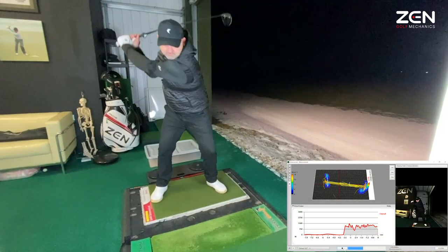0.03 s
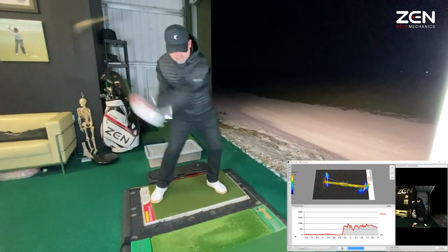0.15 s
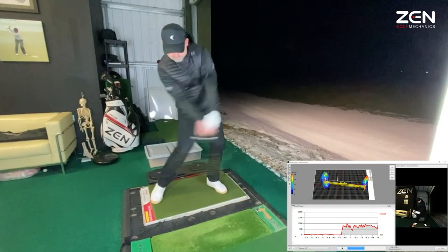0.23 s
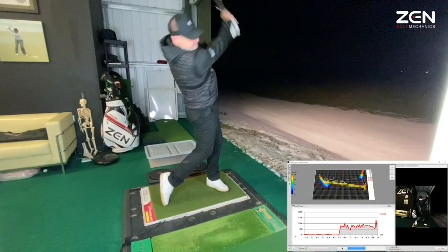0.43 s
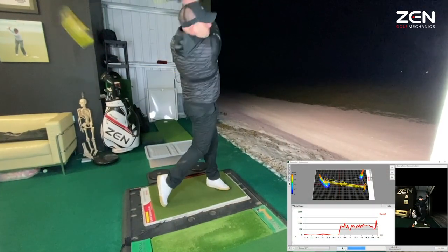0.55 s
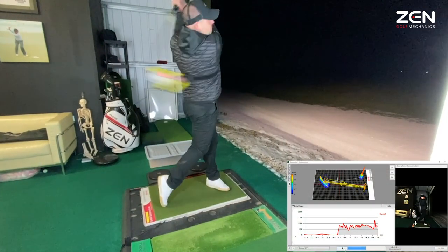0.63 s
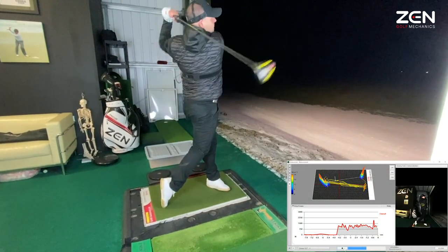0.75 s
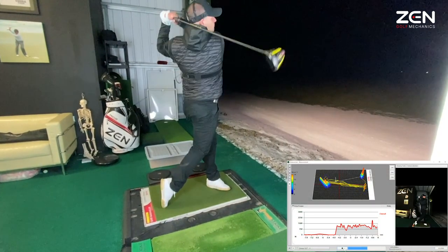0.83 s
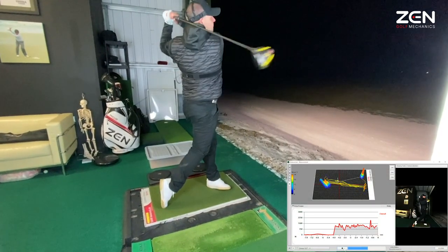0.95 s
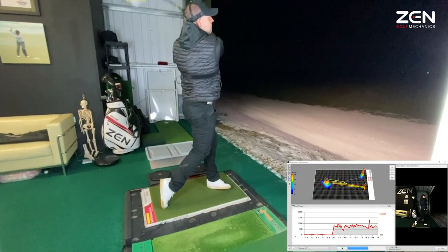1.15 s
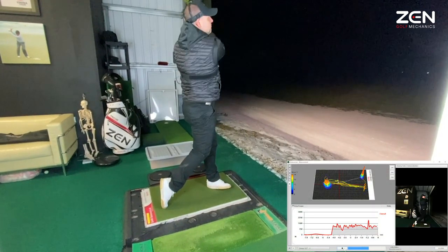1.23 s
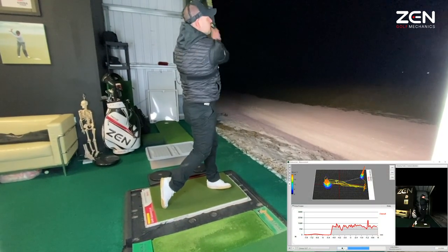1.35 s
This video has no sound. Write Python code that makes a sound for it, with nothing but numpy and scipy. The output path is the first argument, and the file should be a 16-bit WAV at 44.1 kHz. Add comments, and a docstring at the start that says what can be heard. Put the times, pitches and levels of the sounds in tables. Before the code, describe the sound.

Golf club hits ball: quick whoosh, sharp metallic crack, brief bright room ring, then faint clothing rustle

```python
"""Golf drive in an indoor practice bay

A driver is swung and hits a ball: noise bursts with duller echoes make the crack, sine modes the hollow head's ring.
Noise bands dying at their own rates make the hard-walled bay, and a slower burst the ball thudding into the screen.
Level-drawn noise is the air round club and sleeves, then jacket and shoes; low sines are the feet.
A faint room hiss lies underneath; the highest peaks overload and the top is cut."""
import sys
import numpy as np
from scipy import signal
from scipy.fft import rfft, irfft
from scipy.io import wavfile
from scipy.ndimage import uniform_filter1d

SR = 44100
rng = np.random.default_rng(int(sys.argv[2]) if len(sys.argv) > 2 else 0)


def to_wav(sig):
    """Store sig (one row per channel, or 1-D mono) as 16-bit WAV at the path in sys.argv[1].

    Samples outside -1..1 are clipped; the rate is SR.
    """
    pcm = np.clip(np.atleast_2d(sig), -1, 1) * 32767
    pcm = np.round(pcm).astype(np.int16)
    wavfile.write(sys.argv[1], SR, pcm.T)  # frames by channels


N = 61739
T = np.arange(N) / SR
HIT_S = .2385

# Spectrum levels are relative: noise() brings each colour to unit power.


def from_db(db):
    """Decibels to gain."""
    return 10 ** (np.asarray(db) / 20)


def rms_one(x):
    """Scale to unit power."""
    return x / np.sqrt(np.mean(x ** 2) + 1e-20)


def at_hz(points, hz, axis=1):
    """Read a table column on a log-frequency axis."""
    p = np.array(points)
    return np.interp(np.log(hz + 1), np.log(p[:, 0]), p[:, axis])


def level(curve):
    """Gain over time, drawn in straight dB lines between points."""
    return from_db(np.interp(T, *np.transpose(curve)))


def noise(spectrum):
    """White noise coloured by a spectrum table, at unit power."""
    hz = np.fft.rfftfreq(N, 1 / SR)
    coloured = rfft(rng.standard_normal(N)) * from_db(at_hz(spectrum, hz))
    return rms_one(irfft(coloured, N))


def lowpass(x, hz):
    """Gentle second-order treble cut."""
    return signal.sosfilt(signal.butter(2, hz, fs=SR, output="sos"), x)


def decay(start_s, t60_s, build_s=0.00038):
    """Quick rise, then exponential fall of 60 dB per t60; silent before the start."""
    age = np.maximum(T - start_s, 0)
    return (1 - np.exp(-age / build_s)) * from_db(-60 * age / t60_s)


def tick(start_s, level_db, centre_hz, t60_s, q=2.3):
    """A short noise burst through one broad resonance, its top softened."""
    resonance = signal.iirpeak(centre_hz, q, fs=SR)
    burst = signal.lfilter(*resonance, rng.standard_normal(N))
    burst = rms_one(lowpass(burst, centre_hz * 0.86))
    return from_db(level_db) * burst * decay(start_s, t60_s)


# colour of the crack: pitch_hz, level_db
CRACK_COLOUR = [(40,-55.5),(150,-36),(600,-27.5),(1300,-9),(2100,-12),(2900,0),(4000,-2.5),(5200,-4.5),(7500,-5),(9500,-15),(15500,-30)]
# the crack and its early echoes: delay_s after the hit, level_db relative to CRACK_DB, top_edge_hz
CRACK_ARRIVALS = [(0.0,0,12000),(.0065,-3,10000),(.0215,.5,6000),(.025,0,9000),(.0325,2,3800),(.0448,0,5200),(.058,-7,6000)]
CRACK_DB, CRACK_BUILD_S, CRACK_T60_S = -6, .0012, .028
# a hard snap just after the first contact
SNAP_S, SNAP_DB, SNAP_HZ, SNAP_T60_S = .2497, 2, 7400, .007


def crack():
    """The face meets the ball; nearby surfaces return copies with the treble trimmed."""
    out = 0
    for delay_s, level_db, top_edge_hz in CRACK_ARRIVALS:
        burst = noise(CRACK_COLOUR) * decay(HIT_S + delay_s, CRACK_T60_S, CRACK_BUILD_S)
        out = out + from_db(CRACK_DB + level_db) * lowpass(burst, top_edge_hz)
    return out + tick(SNAP_S, SNAP_DB, SNAP_HZ, SNAP_T60_S)


# ringing modes of the clubhead: pitch_hz, level_db relative to RING_DB, t60_s
RING_MODES = [(1357,-9,.12),(1461,-13,.3),(2788,-6,.27),(2899,1,.28),(2990,-2,.3),(3045,-4,.33),(3572,-6,.24),(3882,-4,.3),(4075,-3,.25),(4467,-6,.22),(4563,-4,.27),(5320,-4,.22),(6935,-7,.19),(7801,-7,.18)]
RING_DB, RING_BUILD_S = -20.5, .016


def head_ring():
    """Sine modes of the hollow head at random phases, swelling as the room fills."""
    out = 0
    for pitch_hz, level_db, t60_s in RING_MODES:
        mode = np.sin(2 * np.pi * (pitch_hz * T + rng.random()))
        out = out + from_db(RING_DB + level_db) * decay(HIT_S, t60_s, RING_BUILD_S) * mode
    return out


# reverberation of the bay: pitch_hz, level_db, t60_s
BAY_REVERB = [(30,-41.5,1.0),(170,-22,0.96),(263,-23.5,.85),(550,-12.5,0.43),(950,-11,.45),(1400,-5.5,0.39),(2100,-13.5,.42),(2897,4,.35),(3300,-1,.35),(4030,1,.34),(5000,-1.5,.33),(7700,-4,0.24),(9700,-20,0.32),(15600,-36,.33)]
BAY_DB, BAY_BUILD_S = -6, 0.024
LATE_DB, LATE_T60_S = -44.5, .9


def bay(edge_count=26):
    """Diffuse tail of the crack: each band dies at its own rate, over a faint late part with one rate."""
    spectrum = rfft(noise([row[:2] for row in BAY_REVERB]))
    hz = np.fft.rfftfreq(N, 1 / SR)
    edges = np.geomspace(30, 17000, edge_count)
    late = from_db(LATE_DB) * decay(HIT_S, LATE_T60_S, BAY_BUILD_S)
    out = 0
    for low, high in zip(edges, edges[1:]):
        band = irfft(spectrum * (hz >= low) * (hz < high), N)
        t60_s = at_hz(BAY_REVERB, np.sqrt(low * high), axis=2)
        early = from_db(BAY_DB) * decay(HIT_S, t60_s, BAY_BUILD_S)
        out = out + band * np.hypot(early, late)  # the two parts add in power
    return out


# colour of the ball in the screen: pitch_hz, level_db
SCREEN_COLOUR = [(30,-41.5),(250,-17),(480,0.5),(750,-5.5),(1400,0),(2500,-20),(8000,-40)]
SCREEN_S, SCREEN_DB, SCREEN_T60_S = .260, -26.5, 0.32


def screen():
    """The ball slaps into the hanging fabric: a dull noise burst with a soft front."""
    return from_db(SCREEN_DB) * noise(SCREEN_COLOUR) * decay(SCREEN_S, SCREEN_T60_S, build_s=0.002)


# low rush of air round club and sleeves: start_s, level_db
RUSH_LEVEL = [(0,-46),(.022,-36),(.058,-39.5),(.074,-24.5),(.092,-33),(.125,-53),(.165,-52.5),(.207,-39),(.235,-45.5),(.3,-61),(.4,-76.5)]
# colour of the rush: pitch_hz, level_db
RUSH_COLOUR = [(25,-28.5),(65,-14),(140,0.5),(400,-4),(800,-8),(1300,-17.5),(3000,-35.5),(12000,-53.5)]
# bright swish of the shaft: start_s, level_db
SWISH_LEVEL = [(0,-55),(.025,-43),(.055,-43),(.095,-29.5),(.118,-49),(.14,-60.5),(.185,-54.5),(.222,-45),(.236,-27.5),(.26,-61.5),(.35,-92.5)]
# colour of the swish: pitch_hz, level_db
SWISH_COLOUR = [(150,-14.5),(700,-5.5),(1300,0),(2300,1.5),(3300,-2.5),(4500,-10),(7500,-10.5),(10000,-19.5),(15500,-28.5)]
# the clubhead hums past just before the hit: start_s, level_db
PASS_LEVEL = [(.15,-66),(.185,-45),(.21,-42.5),(.228,-42),(.26,-77.5)]
# colour of the passing head: pitch_hz, level_db
PASS_COLOUR = [(150,-17),(400,-4),(800,0),(1050,-5.5),(1300,-15.5),(4000,-21.5),(12000,-29)]


def swing():
    """Air noise of the downswing: low rush, bright swish and the passing head."""
    rush = level(RUSH_LEVEL) * noise(RUSH_COLOUR)
    swish = level(SWISH_LEVEL) * noise(SWISH_COLOUR)
    passing_head = level(PASS_LEVEL) * noise(PASS_COLOUR)
    return rush + swish + passing_head


# dull rubbing of jacket and shoes: start_s, level_db
RUB_LEVEL = [(.1,-54.5),(.3,-76),(.5,-50.5),(.6,-57.5),(.69,-52.5),(.725,-64.5),(.79,-63),(.885,-79),(.925,-68.5),(1.12,-62.5),(1.2,-66.5),(1.4,-72.5)]
# colour of the rubbing: pitch_hz, level_db
RUB_COLOUR = [(25,-26.5),(80,-1.5),(160,2.5),(450,-4),(900,-9),(1600,-16),(3000,-19),(4000,-30),(12000,-44)]
# the club is lowered past the shoulder and the sleeves slide: start_s, level_db
SLIDE_LEVEL = [(.88,-91),(.93,-61),(1.0,-65.5),(1.105,-58),(1.19,-68.5),(1.3,-86)]
# colour of the slide: pitch_hz, level_db
SLIDE_COLOUR = [(100,-17.5),(250,-3.5),(450,1),(900,-9.5),(1300,-16.5),(2200,-19.5),(3000,-14),(3500,-27.5),(9000,-42)]
# fine rustle of the jacket: start_s, level_db
RUSTLE_LEVEL = [(.14,-52),(.3,-61),(.47,-54),(.55,-65),(.68,-64),(.73,-71.5),(.88,-75),(1.05,-77.5),(1.2,-68.5),(1.4,-75.5)]
# colour of the rustle: pitch_hz, level_db
RUSTLE_COLOUR = [(500,-8),(2000,-3.5),(6000,2.5),(9000,-1.5),(15500,-8)]
# small ticks of tee and clothing: start_s, level_db, centre_hz
SMALL_TICKS = [(.5717,-46,3900),(.775,-62,6000),(.8072,-55,8000)]
TICK_T60_S = .015


def follow_through(grain_db=2.0):
    """Cloth rubs, slides and rustles as the body turns; a few small ticks."""
    flicker = rms_one(uniform_filter1d(rng.standard_normal(N), size=60))
    grains = rms_one(from_db(grain_db * flicker))  # fast level flicker of the rustle
    rub = level(RUB_LEVEL) * noise(RUB_COLOUR)
    slide = level(SLIDE_LEVEL) * noise(SLIDE_COLOUR)
    rustle = level(RUSTLE_LEVEL) * noise(RUSTLE_COLOUR) * grains
    ticks = sum(tick(*row, TICK_T60_S) for row in SMALL_TICKS)
    return rub + slide + rustle + ticks


# feet bump on the mat: start_s, level_db, pitch_hz
FOOT_BUMPS = [(0.092,-35,66),(.088,-31,135),(0.137,-38,82),(0.178,-44,79),(.198,-41,62.4),(0.337,-42,142),(0.502,-42.5,103.5),(0.611,-50,75.1),(0.644,-58,124),(.755,-57,162),(.78,-51,185),(1.194,-52.5,104)]
BUMP_T60_S = 0.1


def feet():
    """Shifts of weight thump the mat as short low sines, softened by the rubber."""
    thumps = 0
    for start_s, level_db, pitch_hz in FOOT_BUMPS:
        tone = np.sin(2 * np.pi * pitch_hz * (T - start_s))
        thumps = thumps + from_db(level_db) * decay(start_s, BUMP_T60_S, build_s=0.0032) * tone
    return lowpass(thumps, 400)


# colour of the room hiss: pitch_hz, level_db
FLOOR_COLOUR = [(25,-14.5),(120,1.5),(400,-6.5),(1200,-15.5),(4000,-18.5),(10000,-18.5),(15500,-22.5)]
FLOOR_DB = -69


def room_hiss():
    """Steady, faint coloured noise of the room."""
    return from_db(FLOOR_DB) * noise(FLOOR_COLOUR)


def scene():
    """All sources at one microphone."""
    shot = crack() + head_ring() + bay() + screen()
    golfer = swing() + follow_through() + feet()
    return (shot + golfer + room_hiss())[None]


CUTOFF_HZ = 15700


def record(dry):
    """The highest peaks overload flat; a steep filter then cuts the top."""
    overloaded = np.clip(dry, -.92, .92)
    top_cut = signal.ellip(10, .1, 70, CUTOFF_HZ, fs=SR, output="sos")
    return signal.sosfilt(top_cut, overloaded)


dry = scene()
out = record(dry)
to_wav(out)
```